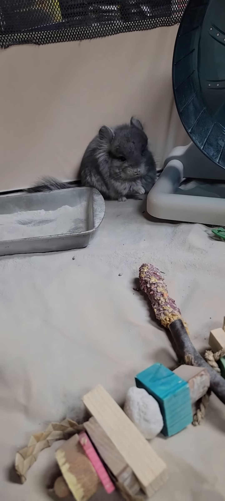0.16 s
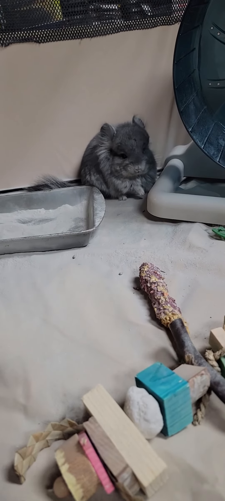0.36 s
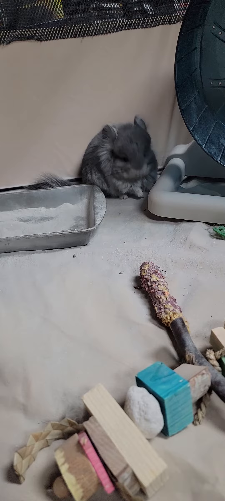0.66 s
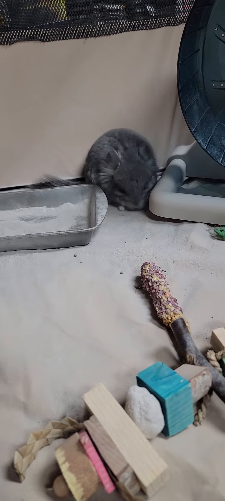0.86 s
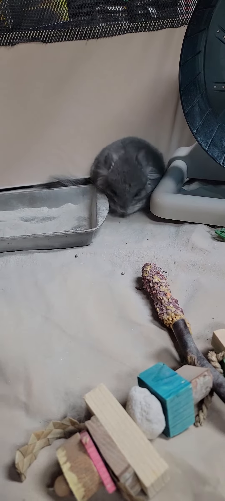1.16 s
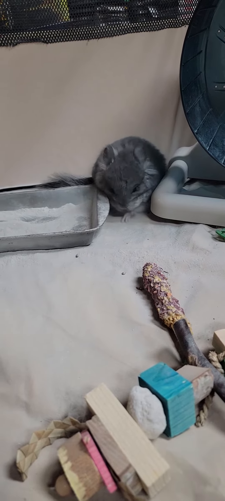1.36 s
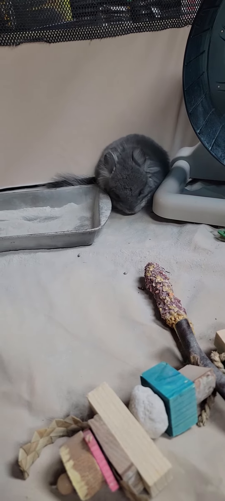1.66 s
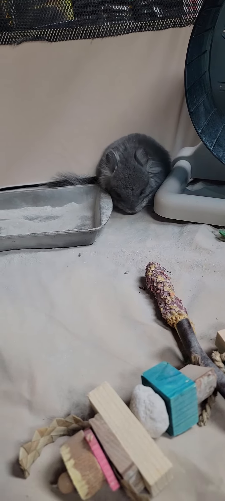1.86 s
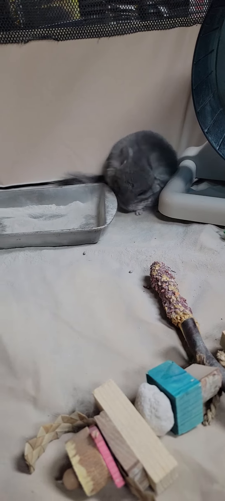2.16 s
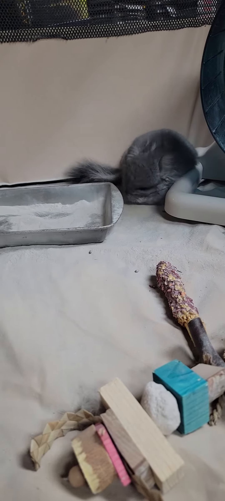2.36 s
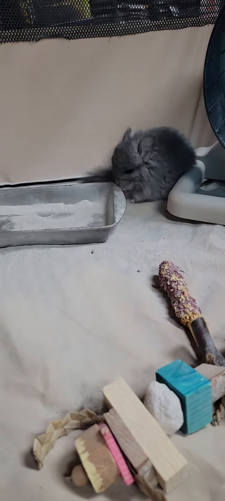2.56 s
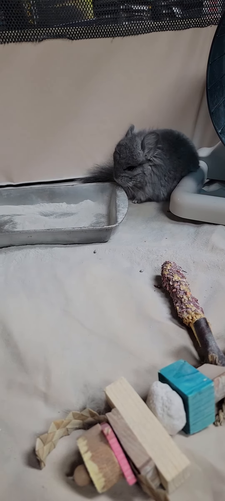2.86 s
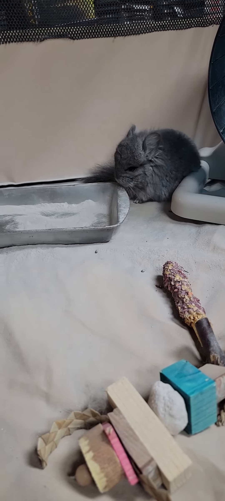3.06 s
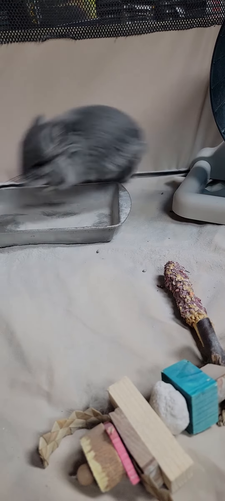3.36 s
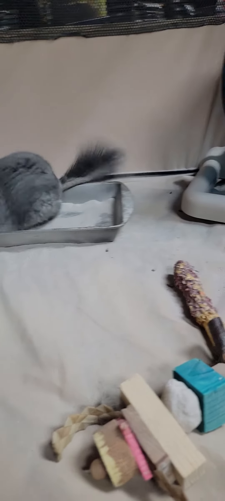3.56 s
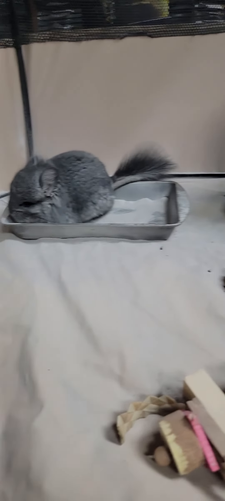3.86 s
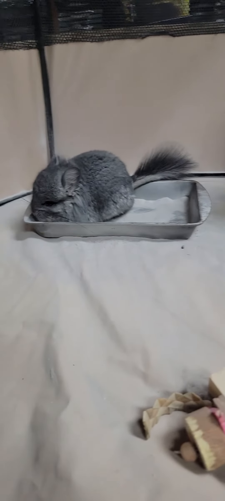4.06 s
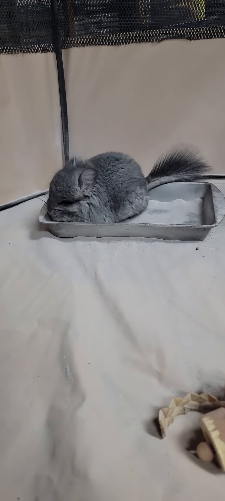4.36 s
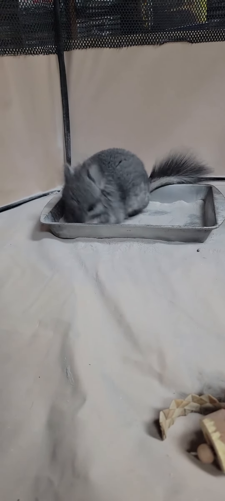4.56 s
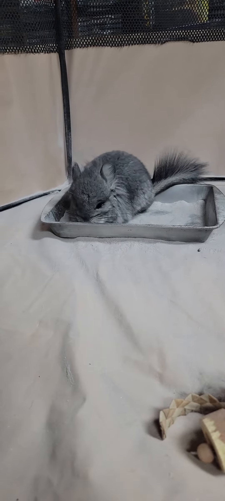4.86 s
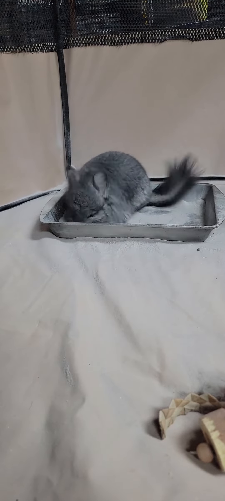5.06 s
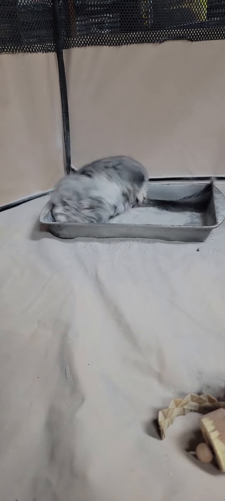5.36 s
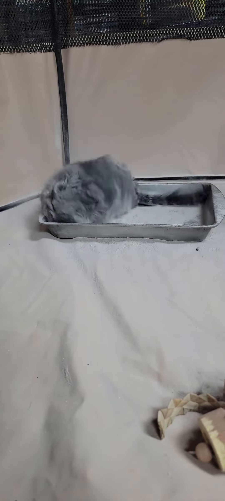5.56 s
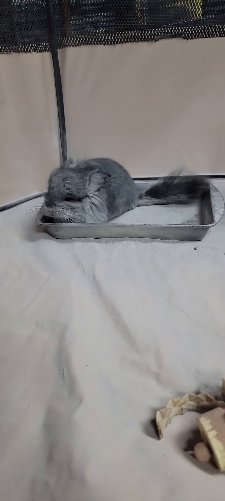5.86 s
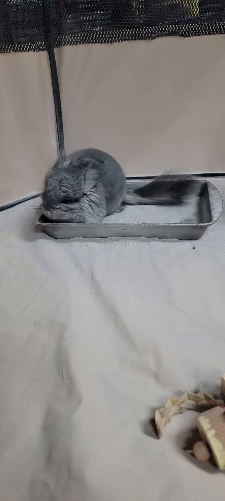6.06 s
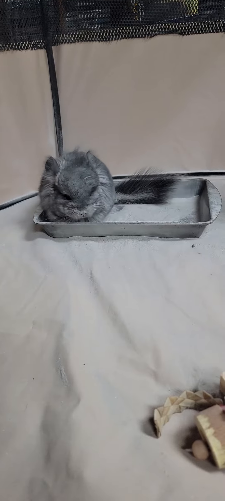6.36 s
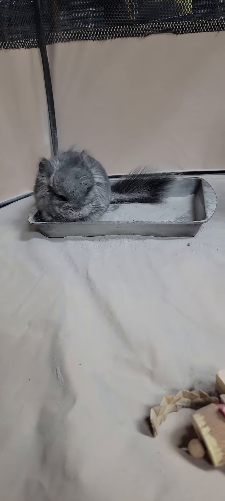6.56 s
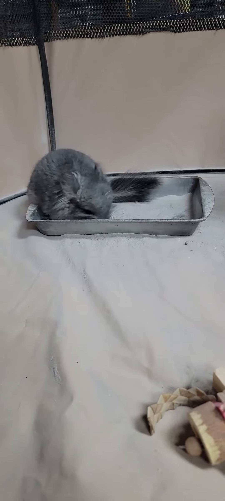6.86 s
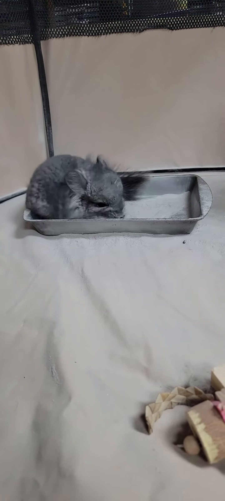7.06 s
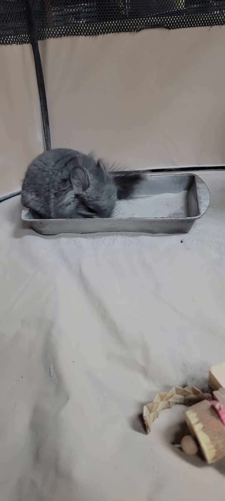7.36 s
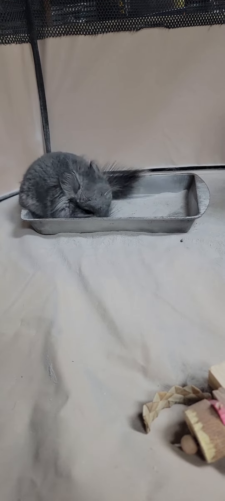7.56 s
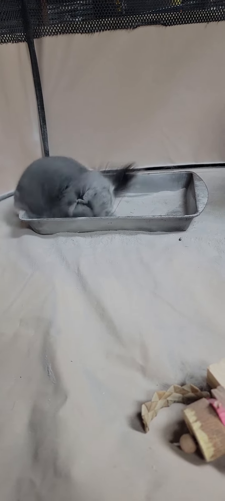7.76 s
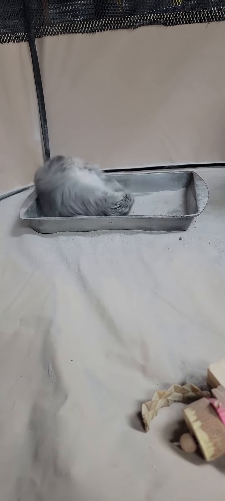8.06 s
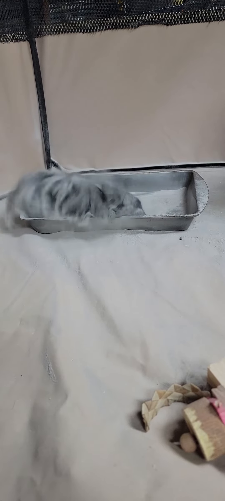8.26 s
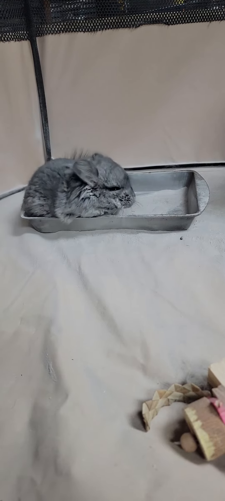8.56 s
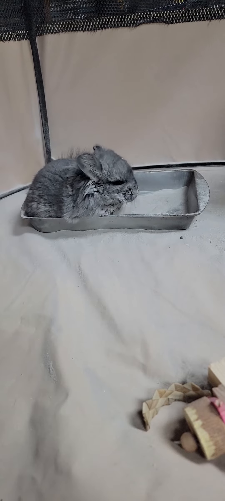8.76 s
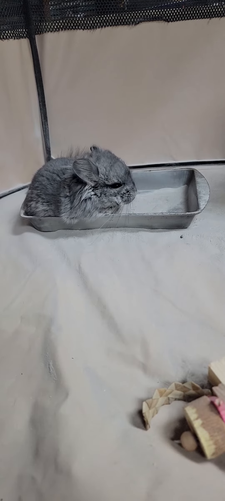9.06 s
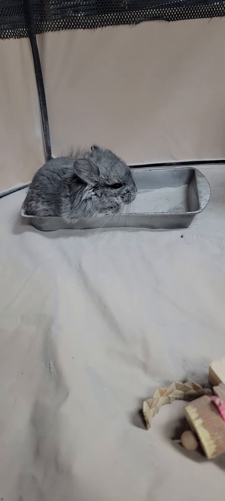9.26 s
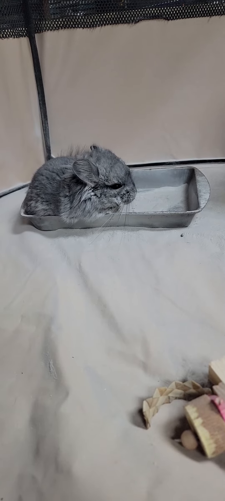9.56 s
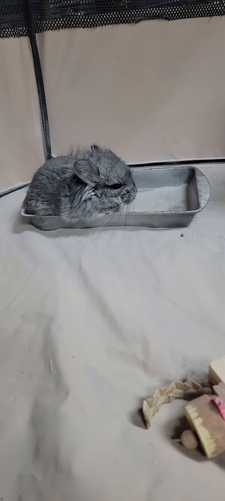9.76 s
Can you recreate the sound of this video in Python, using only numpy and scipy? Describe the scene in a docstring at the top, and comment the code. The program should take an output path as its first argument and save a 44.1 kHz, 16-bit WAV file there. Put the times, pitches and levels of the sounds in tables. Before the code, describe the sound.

A chinchilla scratches a cloth mat in rapid scrapes, then jumps into a metal pan, digging and rolling in dust with tinny knocks.

```python
"""A quiet room hums with faint bright ticks, made from shaped noise; a paw taps a metal loaf pan.
A chinchilla scratches its cloth pen's mat (bursts of tiny noisy slips) as slow footsteps thud (low swaying tones).
In the pan it then digs and rolls in dust: hissing grains, claw noise, and knocks that ring the metal's modes.
Late on come soft chirps (gliding near-sine tones) and a hollow clack (a noisy rattle through a few modes).
Two microphone ports hear it all, with the short echo of the cloth walls on all but the footsteps and hum."""
import sys
import numpy as np
from scipy import signal
from scipy.fft import rfft, irfft
from scipy.io import wavfile
from scipy.ndimage import uniform_filter1d

SR = 44100
rng = np.random.default_rng(int(sys.argv[2]) if len(sys.argv) > 2 else 0)


def voltage_ratio(level):
    """Linear amplitude factor for a level in decibels (scalar or array-like)."""
    return 10 ** (np.asarray(level, float) / 20)


def digitize_waveform(pressure):
    """Quantize a signal to 16-bit integers and store it at the path in sys.argv[1].

    Rows of a 2-D input are taken as channels; values are limited to [-1, 1].
    """
    field = np.atleast_2d(pressure).T
    bounded = np.clip(field, -1, 1)
    quanta = np.round(bounded * 32767).astype(np.int16)
    wavfile.write(sys.argv[1], SR, quanta)


N = 437472
HZ = np.fft.rfftfreq(N, 1 / SR)

# Levels in the tables are starting points: the functions balance the layers afterwards.
# hum of the room and microphone: (frequency [Hz], level [dB])
HUM_COLOUR = [(12, -38.5), (24, -6.5), (68, -1.5), (126, -14), (145, -22), (335, -24), (365, -40),
              (524, -33), (819, -35.5), (1470, -31.5), (2060, -38.5), (5780, -49.5), (6650, -47),
              (9040, -62.5), (15800, -49.5)]
HUM_DB = -56.5
# likeness of the hum at the two ports: (frequency [Hz], likeness [0-1])
HUM_LIKENESS = [(60, 0.97), (250, 1), (800, 0.36), (3000, 0.13), (15000, 0.13)]

# faint bright ticks: (start [s], level [dB])
TICKS = [(0.048, -68), (0.194, -66), (0.3446, -65), (1.988, -68), (9.074, -68.5)]
TICK_HZ, TICK_T60_S = 4700, 0.11  # t60: time to fall by 60 dB

# blows on the pan by paws, claws and body:
# (time [s], ring peak [dB], dull thump [dB], claw crack [dB], frequency the struck spot favours [Hz])
KNOCKS = [(0.413, -53.5, -54.5, -68, 330), (3.186, -63, -58, -59.5, 1350), (3.347, -65, -72, -30.5, 1630),
          (3.457, -27.5, -48, -35, 980), (3.477, -36, -39.5, -55, 540), (3.521, -58, -65, -46, 2600),
          (4.168, -74, -49, -62, 543), (4.615, -67, -53.5, -53, 1350), (4.999, -58, -60.5, -55, 1780),
          (5.236, -62, -65, -58, 2950), (5.564, -36.5, -49, -48, 1780), (5.606, -36.5, -49.5, -56, 530),
          (5.689, -53, -81, -48.5, 2000), (5.705, -61, -71, -39.5, 1370), (5.725, -39.5, -56, -50, 325),
          (5.771, -29.5, -50, -41.5, 1200), (5.974, -30.5, -44, -58, 690), (6.146, -48, -67.5, -58.5, 1770),
          (6.609, -55, -68, -70, 764), (6.785, -49, -69, -67, 770), (7.035, -44.5, -46.5, -51, 537),
          (7.065, -40, -46.5, -38, 1180), (7.119, -45.5, -55, -63, 1350), (7.155, -40, -66, -38, 1620),
          (7.205, -33.5, -65, -57, 820), (7.245, -42, -58, -61, 770), (7.276, -38.5, -71, -50, 774),
          (7.295, -32.5, -50, -53, 950), (7.352, -29.5, -51, -43.5, 1780), (7.428, -41.5, -52, -50, 1800),
          (7.448, -40.5, -60, -69, 950), (7.531, -59, -79, -69, 770), (7.655, -42, -79, -50, 1190),
          (7.676, -37, -63, -68, 790), (7.739, -41.5, -80, -49, 950), (8.221, -62, -55.5, -62, 520),
          (8.28, -54, -54, -50.5, 1780), (8.386, -46.5, -83, -64, 800), (8.411, -42, -50.5, -33.5, 1380),
          (8.45, -26.5, -43.5, -32, 800)]
# the pan: three low modes of rocking and bending, four of its floor, the rest of its walls,
# before retuning and extra damping: (frequency [Hz], level [dB], t60 [s])
PAN_MODES = [(204, -2.5, 0.069), (322.5, -3, 0.12), (535, 0, 0.059), (700, -10, .03), (772, 0, .06),
             (808, -3, .045), (950, -7, .03), (1200, -2, .04), (1360, -2, .04), (1780, 0, .04),
             (2050, -4, .03), (2620, -3, .03), (2950, -3, .035), (3460, -7, .03)]
CRACK_T60_S, CRACK_HALVES_DB = 0.057, 21.5  # t60 of a -45 dB crack; it halves for each 21.5 dB more
SPOT_DB, SPOT_OCTAVES = 9, 0.2  # lift of the favoured modes, and how far it reaches

# quick hind-paw strokes on the mat: (peak [s], level [dB], half length [ms])
STROKES = [(0.748, -57.5, 11.6), (0.861, -72.5, 41), (0.897, -55.5, 21.5), (0.957, -51.5, 9.7),
           (0.99, -52.5, 22), (1.038, -45, 19.6), (1.077, -45.5, 6.6), (1.114, -46, 10.3), (1.138, -37, 10),
           (1.153, -46, 6.7), (1.173, -43.5, 7.5), (1.221, -38, 20.3), (1.26, -43, 8.2), (1.29, -40.5, 7.4),
           (1.311, -35, 8), (1.334, -41.5, 14), (1.381, -35, 20.4), (1.415, -38.5, 5.6), (1.462, -38.5, 23),
           (1.485, -53.5, 8), (1.498, -32.5, 2.1), (1.512, -54, 20), (2.144, -56, 12.7), (2.192, -36, 13),
           (2.292, -43, 20.5), (2.32, -45.5, 7), (2.375, -48, 18.5), (2.422, -50, 16), (2.476, -53.5, 12),
           (2.54, -71.5, 37), (2.578, -59.5, 6.4), (2.628, -63, 27), (2.689, -64.5, 10.4),
           (2.745, -69.5, 39)]
STROKE_SKEW = 0.98  # fall time over rise time
# a claw snags in the mat and lets go at once: (start [s], level [dB])
SNAGS = [(1.033, -35.5), (1.105, -48), (1.135, -45), (1.199, -43), (1.297, -40), (1.369, -46), (1.553, -51),
         (2.095, -61), (2.18, -39), (2.198, -42), (2.244, -47), (2.374, -47), (2.539, -56), (2.624, -61)]
SNAG_T60_S, SNAG_FIZZ_DB = 0.051, -11.5  # fizz level is relative to the snag
# colour of the scrape: (frequency [Hz], level [dB])
SCRAPE_COLOUR = [(410, -47), (700, -31.5), (1060, -25), (1210, -5), (1490, -17), (2220, -7.5), (3750, -6),
                 (5330, -19.5), (9000, -30.5), (11700, -57.5), (19800, -120)]
# resonances of the mat: (frequency [Hz], width [Hz], lift over the scrape [dB])
MAT_PEAKS = [(1316, 320, -4), (1807, 90, 11.5), (2210, 320, 5.5), (2800, 37, -2.5), (3150, 540, 4),
             (3644, 78, -0.5)]
MAT_STRETCH = 0.09  # share by which the mat's ring drifts up and down as the paw pulls it
FIZZ_DB, FIZZ_FOLLOW = -51, 0.84  # fizz for a -47 dB stroke; share of a stroke's dB it follows
# colour of the fizz of fur and fibres: (frequency [Hz], level [dB])
FIZZ_COLOUR = [(4000, -16.5), (6000, 0), (9800, -9.0), (12000, -8.5), (15300, 2.5), (16000, -28)]

# footsteps through the floor: (peak [s], peak level [dB], frequency at the peak [Hz], rise [ms])
STEPS = [(0.753, -27.5, 62.4, 19.3), (1.324, -32, 49.08, 30), (1.932, -39.5, 44.6, 47),
         (2.503, -26.5, 48.94, 19.7), (2.611, -41.5, 60, 25), (3.088, -44.5, 53.75, 61),
         (3.611, -42.5, 40.1, 31), (6.54, -46, 46.36, 16), (7.061, -42.5, 37.7, 34), (7.62, -45, 38.4, 25)]
STEP_FALL, STEP_SINK_PER_S = 1.7, 1.6  # fall time over rise time; rate at which the pitch decays

# how hard the body moves, one list for each bout in the dust: (time [s], hiss of fine dust [dB])
BOUTS = [
    [(3.149, -102), (3.189, -76), (3.344, -76), (3.37, -72), (3.418, -89)],
    [(3.418, -91), (3.444, -75), (3.462, -56), (3.5, -44.5), (3.538, -47), (3.57, -71.5), (3.68, -102)],
    [(4.099, -101.5), (4.16, -70.5), (4.206, -63.5), (4.252, -64), (4.328, -98)],
    [(4.55, -89), (4.57, -67.5), (4.6, -71.5), (4.621, -61), (4.657, -83), (4.679, -71.5), (4.739, -102)],
    [(4.979, -88), (4.998, -80), (5.004, -63), (5.15, -56.5), (5.21, -80)],
    [(5.21, -97), (5.244, -64), (5.45, -67.5), (5.541, -63), (5.647, -72), (5.695, -56), (5.781, -69.5),
     (5.825, -78), (5.919, -99)],
    [(5.958, -90), (5.984, -71), (6.138, -86.5), (6.156, -75.5), (6.284, -83), (6.372, -91), (6.419, -102)],
    [(6.549, -102), (6.613, -85.5), (6.795, -76), (6.828, -89), (6.852, -76), (6.912, -95)],
    [(6.912, -81), (6.952, -73.5), (7.058, -62), (7.273, -61.5), (7.315, -65), (7.385, -65.5), (7.415, -80),
     (7.467, -77), (7.509, -88)],
    [(7.509, -94), (7.583, -79.5), (7.702, -61.5), (7.78, -65.5), (7.88, -76)],
    [(7.88, -72), (8.112, -66), (8.16, -71), (8.203, -78)],
    [(8.203, -73), (8.255, -73), (8.285, -51.5), (8.307, -70), (8.367, -79.5), (8.447, -59), (8.507, -79),
     (8.6, -83), (8.74, -86), (8.8, -102)],
    [(9.54, -103), (9.555, -67.5), (9.59, -83.5), (9.64, -100)],
    [(9.76, -102), (9.844, -86.5), (9.909, -87)],
]
# one row a bout: (scrabble of claws [dB], ring of the pressed pan [dB], how freely the floor rings [0-1]);
# both levels are relative to a hiss at FIRM_DB
POSTURES = [(4.5, 4, 0.18), (4.5, 2.5, 0.66), (4.5, 9.5, 0.026), (2, 3, 0.45), (1.5, -1.5, 1),
            (-1, -3.5, 1), (1.5, -4.5, 1), (1, -11, 0.78), (0.5, 2.5, 1), (-0.5, -2.5, .99),
            (-3.5, -24, 0.87), (0.5, -2, 0.96), (15.5, 6.5, 0.51), (9.5, 6.5, 0.25)]
FIRM_DB, CLAWS_FOLLOW, PRESS_FOLLOW = -69.5, 1, 0.6  # shares of the hiss's dB that each follows
# colour of the dust: (frequency [Hz], level [dB])
DUST_COLOUR = [(180, -24), (300, -44), (391, -55), (519, -12.5), (1010, 2), (1130, 3), (1520, -7.5),
               (2680, -1), (7870, -7), (8550, -15), (15800, -8)]
# strength of the first seven pan modes under pressing paws, as factors
PRESS_WEIGHTS = [0.54, 0.15, 0.34, 0.34, 0.78, 0.44, 0.34]

# soft gliding chirps: (start [s], level [dB], length [s], frequency at start [Hz], frequency at end [Hz])
CHIRPS = [(7.77, -86.5, .11, 476, 503), (7.754, -74, 0.06, 790, 1004), (8.225, -75, 0.031, 1230, 680),
          (8.268, -70, 0.023, 680, 855), (9.403, -81, 0.017, 780, 594), (9.469, -81.5, 0.043, 580, 870),
          (9.515, -80, 0.022, 954, 610), (9.74, -94.5, 0.045, 1240, 1900), (9.783, -87.5, .05, 886, 900),
          (9.846, -85, 0.018, 1560, 754), (9.858, -76.5, 0.023, 640, 870), (9.876, -73.5, 0.032, 930, 796)]

# a hollow clack farther off in the room: (start [s], level [dB], decay of the rattle [s])
CLACK = (9.551, -57, 0.034)
# modes of the clacking object: (frequency [Hz], level [dB], t60 [s])
CLACK_MODES = [(444, 0, 0.12), (505, 3, .1), (900, -4, 0.065), (1250, -3, 0.059), (1620, -3, .07),
               (2020, -4, 0.036), (2850, 0, .09), (4200, 3, .07)]

# how far the left port leads for sound from the mat: (frequency [Hz], lead [radians])
MAT_LEAD = [(0, 1.83), (1640, 6.34), (2580, 7.69), (6120, 10.55), (9990, 10.4), (10800, 11.3),
            (12900, 14.3), (16100, 13.7)]
# the same for sound from the pan and room: (frequency [Hz], lead [radians])
PAN_LEAD = [ (0, 0), (300, .7), (820, 2.2), (1000, 3.4), (1640, 0.06), (3790, 4), (10200, 4), (11000, 4),
            (13000, -1), (16100, -13.5)]
# balance of the ports: (frequency [Hz], left minus right [dB])
LEFT_BALANCE = [(60, -0.5), (150, -6), (380, -6.5), (750, -0.5), (1100, 5.5), (2380, -1), (5980, 2),
                (15000, 0)]
# echo of the cloth walls: (frequency [Hz], t60 [s], level [dB])
PEN_ECHO = [(200, .06, -7), (3730, .07, -7), (14780, .08, -14)]


def evened(x):
    """Scales to an rms of 1."""
    return x / np.sqrt(np.mean(x ** 2) + 1e-20)


def read(points, hz):
    """Reads a table on a log-frequency axis."""
    f, value = np.transpose(points)
    return np.interp(np.log(hz + 1), np.log(f + 1), value)


def add(mix, s, sound):
    """Mixes a sound in at a time in seconds."""
    part = mix[round(s * SR):][:len(sound)]
    part += sound[:len(part)]


def coloured(x, gain):
    """Filters by a gain curve that keeps white noise at its level."""
    return irfft(rfft(x) * evened(gain), N)


def hump(centre_hz, db):
    """A rounded gain curve, down by db one octave from its centre."""
    return voltage_ratio(-db * np.log2((HZ + 1) / centre_hz) ** 2)


def drift(length):
    """Noise smoothed over a number of samples, at rms 1."""
    return evened(uniform_filter1d(rng.standard_normal(N), length))


def grit(per_s, spread_db):
    """Tiny contacts at random moments, a few of them larger."""
    size = voltage_ratio(spread_db * np.minimum(rng.exponential(1, N), 3.5))
    return evened(size * rng.standard_normal(N) * (rng.random(N) < per_s / SR))


def lumps(ms, depth_db):
    """A gain that wanders quickly, as contact comes and goes."""
    return evened(voltage_ratio(depth_db * drift(round(ms * SR / 1000))))


def swell(s, rise_ms, fall_ms):
    """A bell with unequal sides, 5 dB down after the rise or fall time; gives start, times and bell."""
    t = np.arange(-.3, .3, 1 / SR)
    return s - .3, t, voltage_ratio(-5 * (1000 * t / np.where(t < 0, rise_ms, fall_ms)) ** 2)


def modes(table, weights, tune=1, size=6000):
    """The ring after a tap: each mode is a sine that dies away."""
    t = np.arange(size) / SR
    ring = np.zeros(size)
    for weight, (hz, db, t60) in zip(weights, table):
        ring += weight * voltage_ratio(db - 60 * t / t60) * np.sin(2 * np.pi * hz * tune * t)
    return ring


def onset(t, rise_s):
    """A gain that climbs from 0 towards 1."""
    return 1 - np.exp(-t / rise_s)


def room():
    """Steady rumble and hiss with faint drifting patches, partly alike at the two ports."""
    frames, hz = N // 512 + 5, np.fft.rfftfreq(2048, 1 / SR)
    a, b, c, d, patches = rng.standard_normal((frames, 1025, 5)).T
    patches = evened(uniform_filter1d(uniform_filter1d(patches, 20, 0), 8, 1))
    same = np.clip(read(HUM_LIKENESS, hz), 0, 1)[:, None]
    left = a + 1j * b
    right = same * left + np.sqrt(1 - same ** 2) * (c + 1j * d)
    # half of the difference between the ports goes to each side
    half = voltage_ratio(read(LEFT_BALANCE, hz) / 2) * np.exp(.5j * np.interp(hz, *np.transpose(PAN_LEAD)))
    colour = voltage_ratio(read(HUM_COLOUR, hz)[:, None] + 1.6 * patches)
    z = np.array([left, right]) * np.array([half, 1 / half])[:, :, None] * colour
    return voltage_ratio(HUM_DB) * evened(signal.istft(z, nperseg=2048, noverlap=1536)[1][:, :N])


def ticks():
    """Short puffs of treble noise with a sharp start."""
    out, t = np.zeros(N), np.arange(4000) / SR
    puffs = coloured(rng.standard_normal(N), hump(TICK_HZ, 9))
    for s, db in TICKS:
        add(out, s, voltage_ratio(db - 60 * t / TICK_T60_S) * puffs[round(s * SR):][:len(t)])
    return out


def knocks():
    """Each blow rings the pan with a noisy crack; every spot stirs its own mix of modes."""
    out, t = np.zeros(N), np.arange(6000) / SR
    low, floor, side = slice(0, 3), slice(3, 7), slice(7, None)
    band = signal.butter(2, [1000, 5000], "band", fs=SR)
    for s, ring_db, thump_db, crack_db, spot_hz in KNOCKS:
        tune = 1 + .025 * rng.standard_normal()
        noise = rng.standard_normal(6000)
        near = np.log2(np.array(PAN_MODES)[:, 0] / spot_hz) / SPOT_OCTAVES
        spot = voltage_ratio(3 * rng.standard_normal(len(PAN_MODES)) + SPOT_DB / (1 + near ** 2))

        # padded paws load the pan over a few milliseconds
        thump = modes(PAN_MODES[low], spot[low], tune) * onset(t, 0.0027) ** 2
        # fur and dust soon quieten most of the ring
        damping = voltage_ratio(-60 * t / .11) + .2
        ring = modes(PAN_MODES[floor], spot[floor], tune) * onset(t, 0.00057) ** 2 * damping

        # a short rattle of contacts rings the walls
        rattle = noise[:400] * np.exp(-t[:400] / 0.00059)
        walls = signal.oaconvolve(modes(PAN_MODES[side], spot[side], tune), rattle)[:6000]
        splash = evened(signal.lfilter(*band, noise) + 0.31 * noise)
        # a harder crack is shorter
        t60 = np.clip(CRACK_T60_S / 2 ** ((crack_db + 45) / CRACK_HALVES_DB), .01, .3)
        fade = voltage_ratio(-60 * t / t60) * onset(t, 0.00037)
        crack = (.6 * walls / walls[:500].std() + splash) * fade

        blow = voltage_ratio(ring_db + 2.5) * ring / abs(ring).max()
        blow += voltage_ratio(thump_db - 3.5) * thump / thump[:500].std()
        blow += voltage_ratio(crack_db + 1.5) * crack
        add(out, s - .001, blow)
    return out


def scratching():
    """Claw slips ring the mat; fur and fibres fizz above."""
    scrape_power, fizz_power = np.zeros((2, N))
    for s, db, half_ms in STROKES:
        start, _, bell = swell(s, half_ms / np.sqrt(STROKE_SKEW), half_ms * np.sqrt(STROKE_SKEW))
        add(scrape_power, start, (voltage_ratio(db) * bell) ** 2)
        fizz_db = FIZZ_DB + FIZZ_FOLLOW * (db + 47.0)
        add(fizz_power, start, voltage_ratio(fizz_db) ** 2 * bell ** 1.6)  # the fizz lingers longer
    for s, db in SNAGS:
        snap = voltage_ratio(db - 60 * np.arange(4000) / SR / SNAG_T60_S) ** 2
        add(scrape_power, s, snap)
        add(fizz_power, s, voltage_ratio(SNAG_FIZZ_DB) ** 2 * snap)

    slips = grit(6000, 1.0) * lumps(2.5, 2.1) * np.sqrt(scrape_power)
    pull = np.pi * drift(1300) / 3
    scrape = np.zeros(N)
    # fade between a lowered, a plain and a raised mat
    for k in (-1, 0, 1):
        peaks_db = np.zeros(len(HZ))
        for hz, width, db in MAT_PEAKS:
            peaks_db += db / (1 + (2 * (HZ - hz * (1 + k * MAT_STRETCH)) / width) ** 2)
        share = np.sqrt(2 / 3) * np.cos(pull - k * np.pi / 3)
        scrape += coloured(slips * abs(share), voltage_ratio(read(SCRAPE_COLOUR, HZ) + peaks_db))

    fizz = grit(12000, 0.8) * lumps(4, 0.5) * np.sqrt(fizz_power)
    fizz = coloured(fizz, voltage_ratio(read(FIZZ_COLOUR, HZ)))
    # the paw itself lands dully
    pats = coloured(grit(500, 1.0) * fizz_power ** 0.2, hump(550, 9))
    return voltage_ratio(-37) * pats + voltage_ratio(-0.5) * scrape + fizz


def footsteps():
    """The floor sways for a few cycles, sinking in pitch, with a loose shudder around it."""
    out = np.zeros(N)
    shudder = coloured(rng.standard_normal(N), hump(52, 12))
    for s, db, hz, rise_ms in STEPS:
        start, t, bell = swell(s, rise_ms, STEP_FALL * rise_ms)
        turn = 2 * np.pi * np.cumsum(hz * np.exp(-STEP_SINK_PER_S * t)) / SR
        sway = bell * np.cos(turn + 2 * np.pi * rng.random())
        loose = 0.2 * bell ** 0.13 * shudder[round(start * SR):][:len(t)]
        add(out, start, voltage_ratio(db) * (sway + loose))
    return out * voltage_ratio([[-1.2], [1.1]])  # left, right


def bathing():
    """Dust slides through fur and over metal; pressing paws keep the pan ringing."""
    fine, coarse, press, free = np.zeros((4, N))
    for rows, (claws_db, ring_db, share) in zip(BOUTS, POSTURES):
        s, level_db = np.transpose(rows)
        t = np.arange(s[0], s[-1], 1 / SR)
        db = np.interp(t, s, level_db)
        add(fine, s[0], voltage_ratio(db))
        add(coarse, s[0], voltage_ratio(FIRM_DB + claws_db + CLAWS_FOLLOW * (db - FIRM_DB)))
        add(press, s[0], voltage_ratio(FIRM_DB + ring_db + PRESS_FOLLOW * (db - FIRM_DB)))
        add(free, s[0], np.full(len(t), share))

    contact = lumps(13, 1.0)
    colour = voltage_ratio(read(DUST_COLOUR, HZ))
    below = 1 / (1 + (6500 / (HZ + 1)) ** 6)  # near 1 above 6500 Hz, near 0 below
    hiss = coloured(grit(12000, 0.29) * contact * fine, colour * below)
    claws = grit(4000, 1.0) * contact * lumps(3.4, 1.5) * coarse
    scrabble = coloured(claws, colour * (1 - below))

    ring = modes(PAN_MODES[:7], PRESS_WEIGHTS) * onset(np.arange(6000), 90) ** 2
    pats = grit(600, 3) * lumps(12, 4) * press
    rung = signal.oaconvolve(pats * np.sqrt(free), ring / np.linalg.norm(ring))[:N]
    # the muffled share is a dull rub
    rub = grit(3000, 1.6) * contact * press * np.sqrt(np.clip(1 - free, 0, 1))
    dull = coloured(rub, hump(450, 7))
    return voltage_ratio(7.5) * hiss + voltage_ratio(5.0) * scrabble + voltage_ratio(1.5) * rung + voltage_ratio(-0.5) * dull


def chirps():
    """Near-sine glides with a soft start and end and a little second harmonic."""
    out = np.zeros(N)
    for s, db, length, hz_start, hz_end in CHIRPS:
        hz = np.linspace(hz_start, hz_end, round(length * SR))
        turn = 2 * np.pi * np.cumsum(hz) / SR
        tone = np.sin(turn) + 0.054 * np.sin(2 * turn)
        add(out, s, voltage_ratio(db + 22.0) * signal.windows.tukey(len(hz), .6) * tone)
    return out


def clack():
    """A short rattle of contacts rings a hollow object."""
    s, db, rattle_s = CLACK
    t, out = np.arange(6000) / SR, np.zeros(N)
    rattle = rng.standard_normal(6000) * np.exp(-t / rattle_s)
    rattle[0] = 25  # the first contact is the hardest
    sound = signal.oaconvolve(rattle, modes(CLACK_MODES, np.ones(len(CLACK_MODES))))
    add(out, s, voltage_ratio(db) * sound / sound[:2000].std())
    return out


def ports(x, lead):
    """One restless source as the two ports hear it, with the pen's short echo."""
    hz, t, z = signal.stft(x, SR, nperseg=512)
    wander = rng.standard_normal(z.shape[::-1])
    wander = evened(uniform_filter1d(uniform_filter1d(wander, 5, 0), 9, 1)).T
    restless = (1.15 * hz / (hz + 1500))[:, None] * wander  # radians, more in the treble
    turn = np.interp(hz, *np.transpose(lead))[:, None] + restless
    half = voltage_ratio(read(LEFT_BALANCE, hz) / 2)[:, None] * np.exp(.5j * turn)
    direct = signal.istft(z * np.array([half, 1 / half]), SR, nperseg=512)[1][:, :N]

    # the echo is noise that dies away, different at each port
    hz, t, z = signal.stft(rng.standard_normal((2, 9000)), SR, nperseg=128)
    echo = np.array(PEN_ECHO)
    t60, db = read(echo[:, [0, 1]], hz)[:, None], read(echo[:, [0, 2]], hz)[:, None]
    z *= voltage_ratio(db - 60 * t / t60) / np.sqrt(t60 * SR / (6 * np.log(10)))  # unit energy before the level
    tail = np.pad(signal.istft(z, SR, nperseg=128)[1], ((0, 0), (60, 0)))  # starts 60 samples late
    return direct + signal.oaconvolve(x[None], tail, axes=1)[:, :N]


def scene():
    """Everything the ports hear."""
    from_mat = ports(ticks() + scratching(), MAT_LEAD)
    from_pan = ports(knocks() + bathing() + chirps() + clack(), PAN_LEAD)
    return room() + from_mat + footsteps() + from_pan


def top_cut(x):
    """Nothing passes above the cut-off."""
    return signal.sosfilt(signal.butter(12, 16510, fs=SR, output="sos"), x)


def record(dry):
    """Removes the treble above about 15.9 kHz and finishes the mix."""
    edge = signal.firwin(511, 15900, window=("kaiser", 5), fs=SR)
    mix = signal.oaconvolve(dry, edge[None], "same")
    return top_cut(mix)


dry = scene()
out = record(dry)
digitize_waveform(out)
```